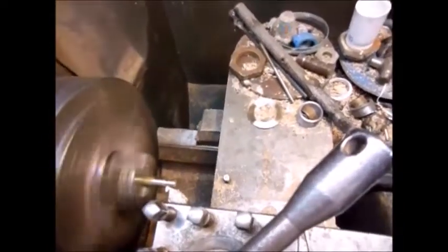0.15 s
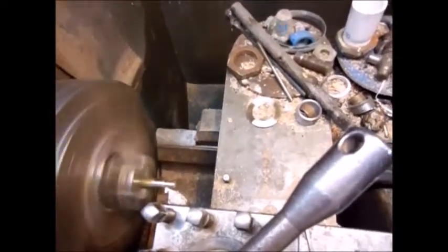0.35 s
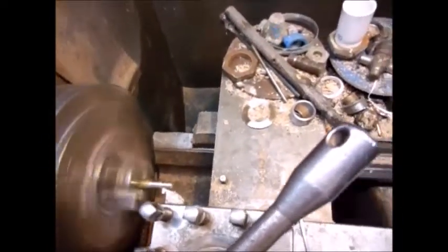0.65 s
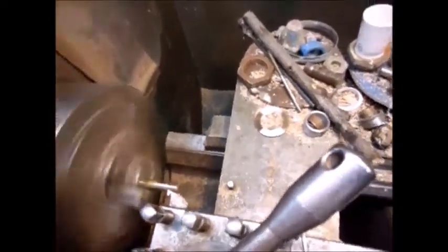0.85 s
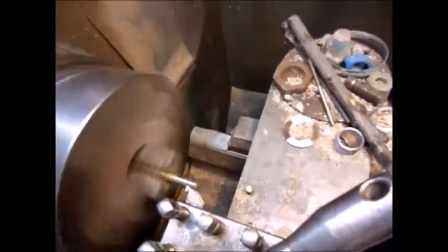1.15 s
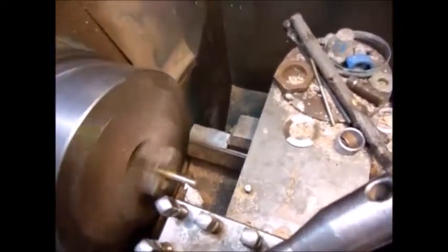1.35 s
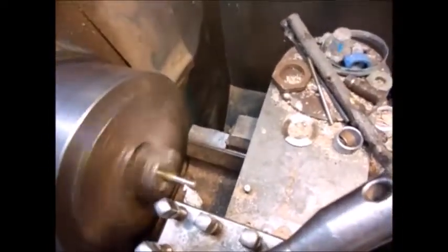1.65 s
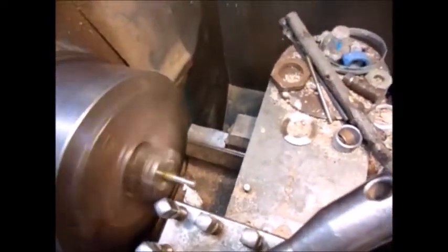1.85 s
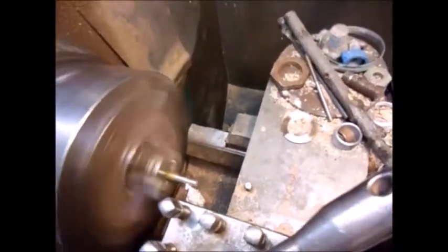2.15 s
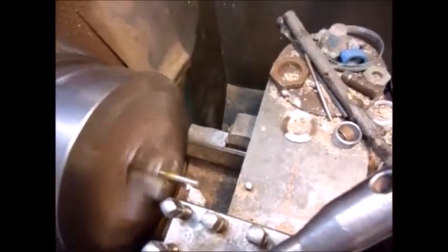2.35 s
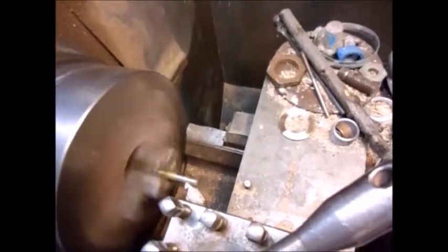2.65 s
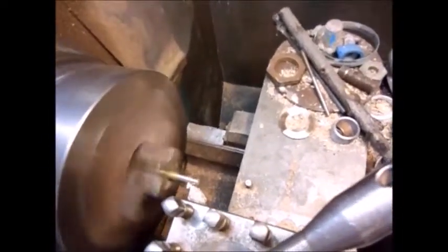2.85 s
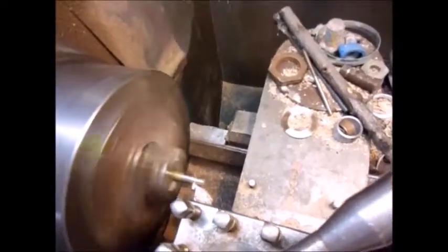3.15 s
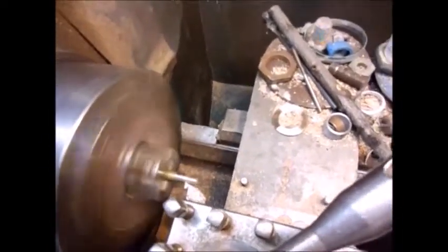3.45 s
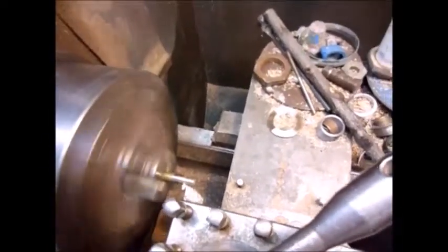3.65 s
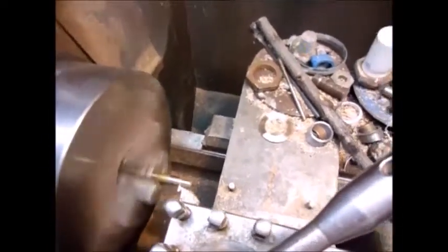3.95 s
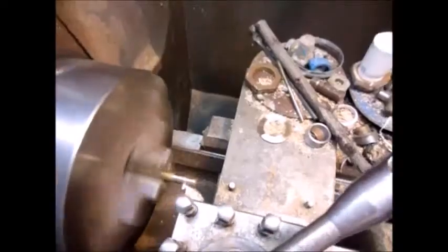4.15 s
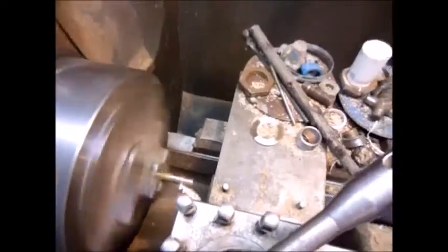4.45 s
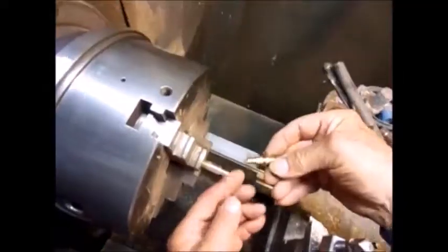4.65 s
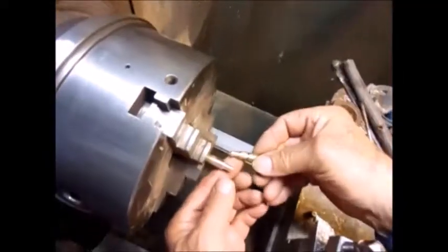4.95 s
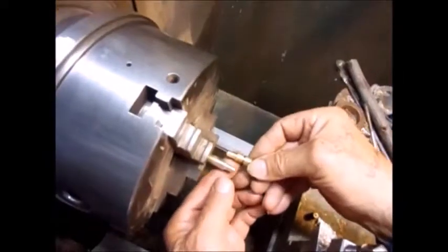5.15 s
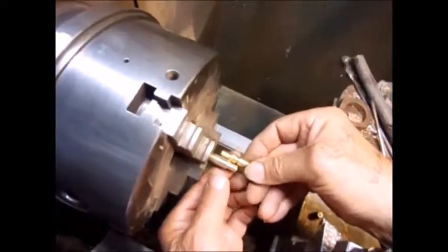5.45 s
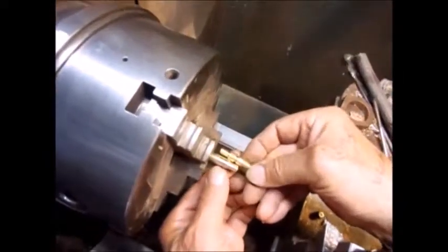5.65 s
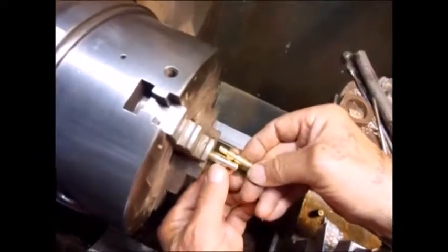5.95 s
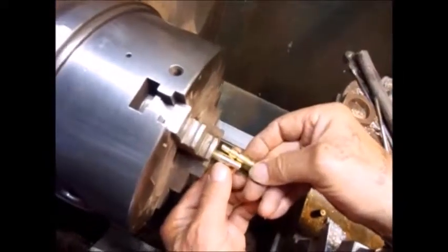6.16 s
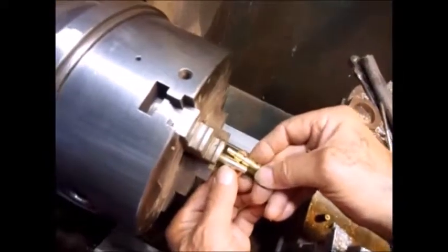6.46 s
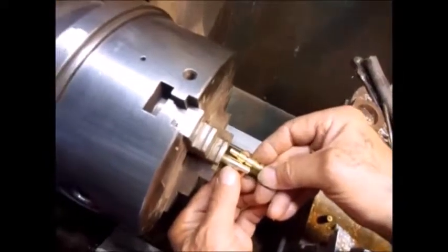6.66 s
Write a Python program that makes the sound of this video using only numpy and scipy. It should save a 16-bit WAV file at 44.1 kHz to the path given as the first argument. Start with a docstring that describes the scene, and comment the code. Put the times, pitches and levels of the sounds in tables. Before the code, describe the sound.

Throbbing gear whine from a running lathe, short high shrieks of a tool biting metal, then abrupt near-silence with faint small-part clicks.

```python
"""Metal lathe, then a quiet workshop

Close-by headstock gears whine (sums of sines), throb with every turn of the shafts and rattle in the casting
(filtered noise). The tool rubs, bites briefly into a brass pin with squeals and shrieks, and goes on singing faintly.
The running sound cuts off at once, leaving workshop air and small noise ticks of brass parts fitted by hand."""
import sys
import numpy as np
from scipy import signal
from scipy.fft import rfft, irfft, next_fast_len
from scipy.io import wavfile

SR = 44100
rng = np.random.default_rng(int(sys.argv[2]) if len(sys.argv) > 2 else 0)


def store_pcm(level_fs):
    """Save levels as 16-bit WAV."""
    pcm = np.round(np.clip(level_fs, -1, 1) * 32767).astype(np.int16)
    wavfile.write(sys.argv[1], SR, np.atleast_2d(pcm).T)


N = 300762
STOP_S = 4.611  # the running sound ends here
TIME = np.arange(N) / SR
SIZE = next_fast_len(N)
BIN_HZ = np.maximum(np.arange(SIZE // 2 + 1) * SR / SIZE, 1)

SHAFT_HZ, COUNTERSHAFT_HZ, BELT_HZ = 15.617, 19.84, 3.058  # turns per second
MAIN_TEETH = 52
TOOL_LAG_S = .00003  # the tool is nearer the left microphone


def from_db(db):
    """Decibels to gain."""
    return 10 ** (np.asarray(db) / 20)


def rms_one(x):
    """Scale to unit power."""
    return x / np.sqrt(np.mean(x ** 2) + 1e-20)


def across_hz(points):
    """Join a table of points over a log-frequency axis."""
    hz, value = np.transpose(points)
    return np.interp(np.log(BIN_HZ), np.log(hz), value)


def drift(rate):
    """Smooth random wandering with spread 1; a higher rate (Hz) wanders faster."""
    step = 40  # samples between computed points
    r = np.exp(-2 * np.pi * rate * step / SR)
    noise = rng.standard_normal(N // step + 2002)
    slow = signal.lfilter([1], [1, -2 * r, r * r], noise)[2000:]  # skip the filter's start-up
    return np.interp(np.arange(N) / step, np.arange(len(slow)), rms_one(slow))


def ramp(start_s, end_s):
    """A straight rise from 0 to 1 between two moments."""
    return np.clip((TIME - start_s) / (end_s - start_s), 0, 1)


def held(start_s, end_s, edge_s):
    """An envelope that rises towards 1 and falls again; with wide edges a short one stays lower."""
    return (np.tanh((TIME - start_s) / edge_s) - np.tanh((TIME - end_s) / edge_s)) / 2


def struck(s, rise_s, decay_s):
    """An envelope that swells to 1 at a moment and dies away, both exponentially."""
    return np.exp(-np.minimum(np.maximum((s - TIME) / rise_s, (TIME - s) / decay_s), 40))


def grit(depth_db):
    """The uneven force of hard contacts that follow each other within milliseconds; rms 1."""
    return rms_one(from_db(depth_db * np.tanh(.7 * drift(450))))


def resonance(hz, width_hz):
    """Gain of one resonance with steep skirts."""
    return 1 / (1 + ((BIN_HZ - hz) / width_hz * 2) ** 2)


def body(spectrum, modes):
    """Gain of a body: a broad slope with resonances standing out of it."""
    lifts = 0
    for hz, width_hz, db in modes:
        lifts = lifts + (from_db(db) ** 2 - 1) / (1 + (2 * (BIN_HZ - hz) / width_hz) ** 2) ** 2
    return from_db(across_hz(spectrum)) * np.sqrt(np.maximum(1 + lifts, .01))


def stereo_noise(gain, alike, force=1):
    """Countless tiny contacts of a given force heard through a filter on two microphones; rms 1."""
    mid, side = rfft(rng.standard_normal((2, N)) * force, SIZE)
    alike = np.clip(alike, -1, 1)  # 1: both sides the same, 0: unrelated
    pair = np.sqrt(1 + alike) * mid + np.sqrt(1 - alike) * side * [[1], [-1]]
    return rms_one(irfft(pair * gain, SIZE)[:, :N])


def panned(x, pan_db):
    """Lean a sound to the left by some dB."""
    return x * from_db(np.array([[1], [-1]]) * pan_db / 2)


def off_centre(pair, lag_s):
    """The sound reaches the right microphone a moment after the left one."""
    late = irfft(rfft(pair[1], SIZE) * np.exp(-2j * np.pi * BIN_HZ * lag_s), SIZE)[:N]
    return np.array([pair[0], late])


def slack(turns_hz, first_s, narrowness):
    """A bump from 0 to 1 once every turn: the teeth ease off slowly and take up again fast."""
    lean = .55
    angle = 2 * np.pi * turns_hz * (TIME - first_s)
    return np.abs(np.cos((angle + lean * (1 - np.cos(angle))) / 2)) ** (2 * narrowness)


def mesh_tone(hz, clock, rough, scatter_hz):
    """Teeth meet at a steady rate, each a little different in force and timing; rms 1."""
    phase = 2 * np.pi * (hz * clock + rng.random())
    uneven = drift(scatter_hz) * np.sin(phase) + drift(scatter_hz) * np.cos(phase)
    return rms_one(np.sin(phase) + rough * uneven)


def rough_tone(hz, stumble):
    """A friction tone whose pitch stumbles from slip to slip by some share, on two microphones; rms 1."""
    pitch_hz = hz * (1 + stumble * (drift(90) + 2 * drift(600)))
    phase = 2 * np.pi * np.cumsum(pitch_hz) / SR
    return rms_one(np.sin(phase + .6 * np.array([drift(60), drift(60)])))


# Turning parts that unload the main mesh once a turn.
# Each row: turns per second, first slack moment in seconds, depth from 0 to 1, narrowness of the slack bump.
TURNING_PARTS = [(SHAFT_HZ, 0.026, 0.71, 3.5), (COUNTERSHAFT_HZ, 0.025, 0.35, 1.2),
                 (BELT_HZ, 0.19, 0.4, 0.77), (3 * BELT_HZ, 0.024, 0.29, 1.8)]


def tooth_load():
    """Each slightly eccentric part eases the pressure on the teeth once a turn; rms 1."""
    load = np.ones(N)
    for turns_hz, first_s, depth, narrowness in TURNING_PARTS:
        load = load * (1 - depth * slack(turns_hz, first_s, narrowness))
    return rms_one(load)


# Weaker gear tones. Each row: pitch in Hz, level in dB, roughness from 0 to 1.
WEAK_GEAR_TONES = [(300, -58, .3), (384, -44.5, .8), (398, -49, .8), (546.6, -47.5, .25), (634, -51, .25),
                   (1093.5, -48, .3), (1230, -47, .9), (1270, -45, .9), (1358.6, -39.5, .25),
                   (1381, -46, .6), (1465.5, -44, .35), (1482, -45, .35), (1569, -42, .4), (1584, -46, .4),
                   (1603.5, -36.5, .18), (1624.1, -36.3, .18), (1647, -45, .3), (1666, -46, .3),
                   (1683, -42.5, .3), (1697.5, -36, .14), (1727, -40, .3), (1994, -49, .35),
                   (2033, -49.5, .3), (2080, -40, .2), (2187, -49, .4), (2438, -50, .4)]
# Moments when the main whine surges or slackens. Each row: time in seconds, change in dB.
WHINE_SURGES = [(.15, -2), (.5, 1.5), (.84, 0.5), (1.005, 4), (1.2, 4), (1.66, 3), (1.78, -1), (2.03, -1.5),
                (2.22, 3), (2.365, 2.5), (2.565, 0), (2.67, 4), (2.87, 2.5), (3.125, 2.5), (3.885, 2),
                (3.97, -1), (4.54, 1)]


def gears(load):
    """The main mesh throbs with the load; the belt sways the speed of all gear tones together."""
    sway_s, slip_s, surge_width_s = .00012, .00007, .018
    sway = sway_s * np.cos(2 * np.pi * BELT_HZ * (TIME - .14))
    clock = TIME + sway + slip_s * slack(SHAFT_HZ, 0.06, 0.53)

    whine_db = -22 - 5.5 * ramp(3.1, 5.1)  # starts to ease off just before the bites
    for s, db in WHINE_SURGES:
        whine_db = whine_db + db * np.exp(-((TIME - s) / surge_width_s) ** 2)
    main_mesh = mesh_tone(SHAFT_HZ * MAIN_TEETH, clock, rough=0.028, scatter_hz=35.4)
    out = panned(from_db(whine_db) * load * main_mesh, pan_db=-0.8)

    for hz, db, rough in WEAK_GEAR_TONES:
        tone = from_db(db) * mesh_tone(hz, clock, rough, scatter_hz=13.8)
        out += panned(tone, rng.normal(0.68, 2.1))
    return out


# Colour of the gear rattle. Each row: frequency in Hz, relative strength in dB per Hz.
RATTLE_COLOUR = [(25, -41), (42, -37), (58, -21), (75, -27), (160, -22.5), (205, -17), (300, -11.5),
                 (430, -11), (650, -5.5), (1050, -3.5), (1700, -3), (2500, -3.5), (3300, -7.5),
                 (5000, -10.5), (7000, -19), (10000, -27.5), (14000, -29.5)]
# Resonances of the headstock casting. Each row: frequency in Hz, width in Hz, lift in dB.
CASTING_MODES = [(393, 25, 10.5), (808.5, 127, 15.5), (1226, 16, 13), (1290, 22, 4), (1370, 57, 10),
                 (1634, 260, 5.5), (1840, 180, 6), (1886, 21, 0), (2020, 26, 3), (2081, 90, 12),
                 (2194, 48, 7.5), (2380, 99, 7), (2610, 70, 5.5), (2700, 60, 3.5), (3460, 200, 2.5),
                 (4225, 155, 4), (5250, 260, 2), (7300, 280, 4), (13470, 532, 0)]
# How alike left and right are. Each row: frequency in Hz, likeness from 0 to 1.
HEADSTOCK_LIKENESS = [(60, 1), (450, 0.99), (900, 0.84), (1800, 0.92), (3500, 0.54), (7000, 0.16),
                      (14000, 0.38)]
# How the rattle leans to one side. Each row: frequency in Hz, left minus right in dB.
RATTLE_LEANING = [(60, 0), (120, -1), (230, 0.5), (460, 1.5), (910, 0.5), (1800, 1), (3560, 0.5),
                  (7040, 0.5), (13900, -1)]


def rattle(load):
    """Teeth and bearings clatter into the casting, in bursts that follow the shafts."""
    turning_db = 0.52 * load + 0.45 * slack(COUNTERSHAFT_HZ, 0.036, 1.55)
    force = from_db(turning_db + 1.0 * drift(31.0) + 0.2 * drift(400))
    casting = panned(body(RATTLE_COLOUR, CASTING_MODES), across_hz(RATTLE_LEANING))
    return from_db(-25.5) * stereo_noise(casting, across_hz(HEADSTOCK_LIKENESS), force)


# Colour of the spindle growl. Each row: frequency in Hz, relative strength in dB per Hz.
GROWL_COLOUR = [(150, -39), (300, -21), (385, 1), (425, -1.5), (480, 5.5), (560, 2.5), (680, -6.5),
                (950, -27), (2000, -60.5)]
# Throbs that beat together. Each row: throbs per second, first crest in seconds, swing in dB.
GROWL_THROBS = [(6.26, .158, 5.0), (2.47, .237, 2.6), (8.73, .111, 2.1)]
# Swells of the casting's hum. Each row: start in seconds, end in seconds, level in dB before soft edges.
CASTING_HUMS = [(0.922, 0.973, -35.5), (1.068, 1.092, -31.5), (1.742, 1.815, -37.5), (2.554, 2.625, -43),
                (3.954, 4.038, -35)]


def growl():
    """Spindle bearings rumble and throb under the heavy chuck; the casting hums up low in swells."""
    force_db = 1.5 * slack(SHAFT_HZ, 0.076, 0.74) + 2.0 * drift(25)
    for hz, crest_s, db in GROWL_THROBS:
        force_db = force_db + db * np.cos(2 * np.pi * hz * (TIME - crest_s))
    level = from_db(-37.5 - 2 * ramp(3.9, STOP_S))
    rumble = level * stereo_noise(from_db(across_hz(GROWL_COLOUR)), 1.0, from_db(force_db))

    swells = sum(from_db(db) * held(start, end, edge_s=0.0057) for start, end, db in CASTING_HUMS)
    return rumble + swells * mesh_tone(388, TIME, rough=0.26, scatter_hz=9.5)


# When the cover rings out. Each row: start in seconds, end in seconds, level in dB added to the idle hum.
COVER_RINGS = [(0.774, 1.11, -39), (1.302, 1.475, -31), (3.356, 3.393, -28), (3.47, 3.805, -38.5)]


def cover():
    """A thin cover, shaken by the gears, hums faintly and rings out in a few swells."""
    swells = sum(from_db(db) * held(start, end, edge_s=0.014) for start, end, db in COVER_RINGS)
    return (from_db(-43.5) + swells) * stereo_noise(resonance(1493, 110), 0.96)


# Hard bursts of clashing teeth. Each row: time in seconds, decay in seconds, level in dB.
CLASH_BURSTS = [(.04, .014, -35), (.068, 0.012, -31), (.32, .012, -42), (.441, 0.014, -36),
                (0.646, 0.015, -34), (.752, 0.015, -31), (.777, 0.022, -24), (.984, 0.0082, -30),
                (1.104, 0.011, -28), (1.275, 0.026, -34), (1.657, 0.015, -25.5), (1.809, 0.026, -33),
                (2.072, 0.013, -25.5), (2.435, 0.018, -29), (2.558, 0.022, -29), (2.696, 0.017, -35),
                (3.022, 0.014, -33), (3.067, 0.015, -28), (3.772, 0.021, -27), (3.832, .012, -35),
                (4.541, 0.016, -23.5), (4.593, 0.017, -28)]
# Colour of the clashes. Each row: frequency in Hz, relative strength in dB per Hz.
CLASH_COLOUR = [(500, -27.5), (1500, 1), (2600, 2), (4000, 0), (5500, -7), (8000, -16), (11000, -29),
                (14000, -27)]


def clashes():
    """Teeth knock across their backlash: lightly at random, and now and then in a hard burst."""
    knocks_per_s, knock_db, knock_decay_s = 70, -39, .006
    hits = (rng.random(N) < knocks_per_s / SR) * rng.uniform(.3, 1, N)
    fade = np.exp(-1 / (knock_decay_s * SR))
    knocks = rms_one(signal.lfilter([1], [1, -fade], hits + 1e-18))
    bursts = sum(from_db(db) * struck(s, 0.0044, decay_s) for s, decay_s, db in CLASH_BURSTS)
    casting = body(CLASH_COLOUR, CASTING_MODES)
    ringing = stereo_noise(casting, across_hz(HEADSTOCK_LIKENESS), grit(depth_db=2))
    return panned((from_db(knock_db) * knocks + bursts) * ringing, pan_db=2.0)


# The tool bites. Each row: start in seconds, end in seconds, chip level in dB before the flutter.
TOOL_BITES = [(3.119, 3.157, -33), (3.239, 3.274, -28.5), (3.363, 3.4, -28), (3.4, 3.48, -31.5),
              (3.483, 3.535, -28), (3.535, 3.566, -31)]
# The edge rubs lightly. Each row: start in seconds, end in seconds, level in dB before soft edges.
TOOL_RUBS = [(1.78, 2.1, -50), (2.12, 2.164, -43), (2.438, 2.8, -49.5), (2.796, 3.1, -47),
             (3.11, 3.183, -39), (3.224, 3.56, -39), (3.56, 3.86, -40), (3.86, 4.135, -43),
             (4.17, 4.262, -40.5), (4.266, 4.43, -37.5), (4.443, 4.606, -39.5)]
# Colour of the chip tearing. Each row: frequency in Hz, relative strength in dB per Hz.
CHIP_COLOUR = [(1000, -32), (3000, -1), (5000, -4.5), (7000, -2.5), (9800, -13), (11000, -8.5),
               (13500, -2.5), (14500, -11.5)]
# Resonances of tool and pin. Each row: frequency in Hz, width in Hz, lift in dB.
TOOL_AND_PIN_MODES = [(5130, 680, 8), (6300, 260, 0.5), (7500, 420, 4), (8030, 210, 13), (8900, 600, 4),
                      (10900, 370, 9), (12540, 300, 0), (13450, 650, 4.5)]


def cutting():
    """Brass tears off in tiny chips that ring the tool; around the bites the edge rubs and sings in flurries."""
    sing_hz, flutter_db = 8060, 1.8
    bites = sum(from_db(db) * held(start, end, edge_s=.004) for start, end, db in TOOL_BITES)
    pressure = bites * from_db(flutter_db * drift(70))
    rubbing = sum(from_db(db) * held(start, end, edge_s=0.031) for start, end, db in TOOL_RUBS)

    tool = body(CHIP_COLOUR, TOOL_AND_PIN_MODES)
    # light rubbing is duller than a bite: 8 dB less per octave above the singing
    dull = from_db(-8 * np.maximum(np.log2(BIN_HZ / sing_hz), 0))
    chips = pressure * stereo_noise(tool, 0.27, grit(depth_db=-1.0))
    chips += rubbing * stereo_noise(tool * dull, 0.3, from_db(2.5 * drift(62)))

    flurries = rms_one(from_db(11 * np.tanh(drift(80))))
    sing_level = from_db(-15) * pressure + from_db(-5) * rubbing
    singing = sing_level * flurries * rough_tone(sing_hz, stumble=.009)
    return panned(chips, pan_db=1.5) + off_centre(panned(singing, pan_db=5.5), TOOL_LAG_S)


# Brief shrieks. Each row: middle in seconds, length in seconds, pitch in Hz, glide in Hz per second,
# level in dB before soft edges.
TOOL_SHRIEKS = [(3.124, .008, 8050, 0, -28), (3.133, .007, 8330, 0, -32), (3.144, .011, 8000, -15000, -27),
                (3.243, .007, 8030, 0, -32), (3.257, .0094, 8050, 0, -22.5), (3.258, .012, 6550, 0, -39),
                (3.274, .005, 8030, 0, -32), (3.366, .007, 8600, 0, -31), (3.371, .007, 3120, 0, -31.5),
                (3.372, .012, 6380, 0, -35), (3.378, .009, 7950, 0, -30), (3.426, .008, 7520, 15000, -33),
                (3.429, .01, 6230, 35000, -34), (3.446, .007, 8050, 0, -29), (3.495, .008, 8030, 0, -25),
                (3.497, .007, 5230, 0, -30), (3.511, .012, 8000, 0, -26), (3.514, .008, 5250, 0, -34),
                (3.544, .005, 6300, 0, -33), (3.548, .0066, 7980, 30000, -24.5),
                (3.562, .005, 8100, 0, -34), (3.72, .008, 8050, 0, -39), (3.751, .008, 8050, 0, -38),
                (4.285, .01, 8020, 0, -37), (4.307, .013, 8050, 0, -33), (4.333, .008, 8020, 0, -37),
                (4.384, .008, 8020, 0, -38), (4.403, .013, 8020, -22000, -33),
                (4.467, .016, 8060, 9000, -35.5), (4.537, .008, 8030, 0, -38),
                (4.587, .007, 7950, -20000, -39)]


def shrieks():
    """A catching chip throws the tool into one of its modes for about a hundredth of a second."""
    out = np.zeros((2, N))
    for s, length_s, hz, glide, db in TOOL_SHRIEKS:
        near = np.abs(TIME - s) < 2 * length_s
        wobble = np.cumsum(rng.standard_normal(near.sum())) * .035
        phase = 2 * np.pi * np.cumsum(hz + glide * (TIME[near] - s)) / SR + wobble
        envelope = held(s - length_s / 2, s + length_s / 2, edge_s=0.0018)[near]
        out[:, near] += from_db(db) * envelope * np.sqrt(2) * np.sin(phase)
    return off_centre(panned(out, pan_db=4.0), TOOL_LAG_S)


# The chip's squeal; late on its slip rate sags and recovers.
# Each row: time in seconds, slips per second, level in dB.
CHIP_SQUEAL = [(3.15, 1290, -41), (3.238, 1280, -37), (3.246, 1262, -28), (3.254, 1260, -37),
               (3.358, 1260, -37), (3.365, 1255, -28), (3.379, 1225, -38), (3.386, 1212, -33),
               (3.394, 1215, -39), (3.401, 1250, -32), (3.407, 1345, -32), (3.422, 1240, -39),
               (3.436, 1250, -27), (3.458, 1250, -30), (3.466, 1165, -32), (3.471, 1120, -39),
               (3.48, 1078, -30.5), (3.49, 1010, -40), (3.499, 965, -35), (3.506, 940, -39),
               (3.514, 932, -31), (3.53, 1040, -41), (3.538, 1110, -30), (3.543, 1250, -42),
               (3.55, 1322, -33), (3.56, 1325, -34)]
# Partials of the squeal. Each row: multiple of the slip rate, relative level in dB.
SQUEAL_PARTIALS = [(3, -10), (4, 0), (5, -8), (6, -10), (7, -14)]


def squeal():
    """In each bite the chip sticks and slips on the tool face: a hoarse, gliding squeal."""
    s, slips, db = np.transpose(CHIP_SQUEAL)
    biting = sum(held(start, end, edge_s=0.004) for start, end, _ in TOOL_BITES)
    level = from_db(np.interp(TIME, s, db)) * biting
    slip_hz = np.interp(TIME, s, slips) * (1 + .006 * drift(120) + .021 * drift(900))
    phase = 2 * np.pi * np.cumsum(slip_hz) / SR

    snatch_db = 5  # each partial flickers by up to this much
    tone = np.zeros((2, N))
    for multiple, lift_db in SQUEAL_PARTIALS:
        strength = from_db(lift_db + snatch_db * np.tanh(drift(150)))
        tone += strength * np.sin(multiple * phase + rng.normal(0, 0.49, (2, 1)))
    return level * rms_one(tone)


# Colour of the workshop air. Each row: frequency in Hz, relative strength in dB per Hz.
AIR_COLOUR = [(25, -32), (60, -2), (110, -6.5), (260, -2.5), (470, -2.5), (650, -1), (1050, -1.5),
              (1600, -9), (2100, -13.5), (4000, -19.5), (8000, -27), (14000, -32.5)]
# How alike the air is left and right. Each row: frequency in Hz, likeness from 0 to 1.
AIR_LIKENESS = [(60, 0.98), (180, 0.87), (530, 0.9), (1570, 0.67), (4680, 0.061), (13900, 0.03)]


def workshop():
    """Dull room air with a low drone and a very faint high whistle; the last of the lathe dies away in it."""
    lift = ramp(5.84, 5.86)  # air rises slightly and the drone strongly, then both stay up
    air_gain = from_db(across_hz(AIR_COLOUR))
    air = from_db(-55.5 + 1 * lift) * stereo_noise(air_gain, across_hz(AIR_LIKENESS))
    drone = from_db(-77 + 16 * lift) * stereo_noise(resonance(228.5, 73), 1.0)
    tail_db, tail_decay_s = -48, .06
    fade = np.exp(-np.abs(TIME - STOP_S) / tail_decay_s)
    tail = from_db(tail_db) * fade * stereo_noise(resonance(1300, 3200), 0.97)
    whistle = from_db(-85) * mesh_tone(13200, TIME, rough=.4, scatter_hz=30)
    return panned(air + drone + tail + whistle, pan_db=0.5)


# Parts touch and slide in the hands. Each row: time in seconds, level in dB, rise in seconds,
# decay in seconds, centre in Hz, width in octaves.
HAND_TOUCHES = [(4.634, -49, .0003, .0046, 4500, .75), (4.6925, -49, .0002, .002, 3200, 1.0),
                (4.697, -48, .0002, .004, 3000, 1.0), (4.706, -41.5, .001, .006, 4000, .7),
                (4.7065, -48, .001, .006, 4600, .07), (4.712, -50, .001, .006, 5600, .05),
                (4.707, -41, .001, .003, 11000, .25), (4.7125, -42.5, .001, .004, 6000, .9),
                (4.708, -52, .003, .01, 1800, .6), (4.755, -60, .005, .02, 2400, .7),
                (4.836, -58, .007, .02, 2400, .24), (4.943, -58, .0005, .007, 3510, .14),
                (5.494, -62, .0005, .006, 11300, .04), (5.495, -66, .0005, .006, 8000, .3),
                (5.495, -61, .003, .008, 1550, .2), (5.693, -58, .018, .024, 1750, .3),
                (6.49, -66, .006, .02, 2250, .15), (6.53, -64, .04, .07, 3400, .011),
                (6.5485, -44.5, .0006, .0022, 1100, .45), (6.7165, -44, .0004, .002, 4550, .12),
                (6.801, -43, .0006, .002, 1680, .22)]


def touches():
    """Sharp ticks and short gritty slides, each ringing in its own band."""
    out, force = np.zeros((2, N)), grit(depth_db=6.5)
    for s, db, rise_s, decay_s, hz, octaves in HAND_TOUCHES:
        band = np.exp(-.5 * (np.log2(BIN_HZ / hz) / octaves) ** 2)
        out += from_db(db) * struck(s, rise_s, decay_s) * stereo_noise(band, 0.48, force)
    return out


def scene():
    """The running lathe, then all at once the quiet shop."""
    load = tooth_load()
    headstock = off_centre(gears(load), lag_s=.00005)
    headstock += off_centre(rattle(load) + growl() + cover() + clashes(), lag_s=.000028)
    running = headstock + cutting() + shrieks() + squeal()
    quiet = workshop() + touches()
    return np.where(TIME < STOP_S, running, quiet)


def record(dry):
    """The top of the treble is cut steeply above 14100 Hz."""
    low_pass = signal.ellip(12, .1, 80, 14100, fs=SR, output="sos")
    return signal.sosfilt(low_pass, dry)


dry = scene()
out = record(dry)
store_pcm(out)
```